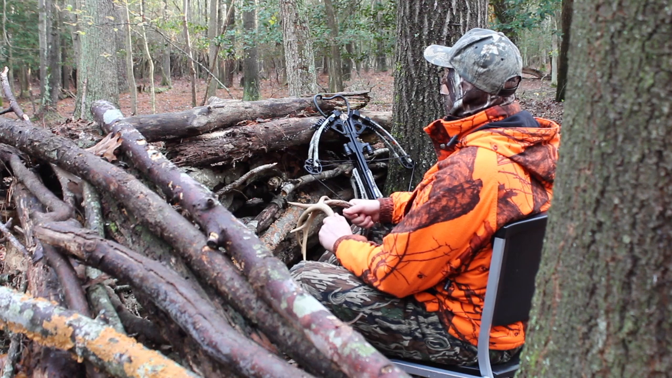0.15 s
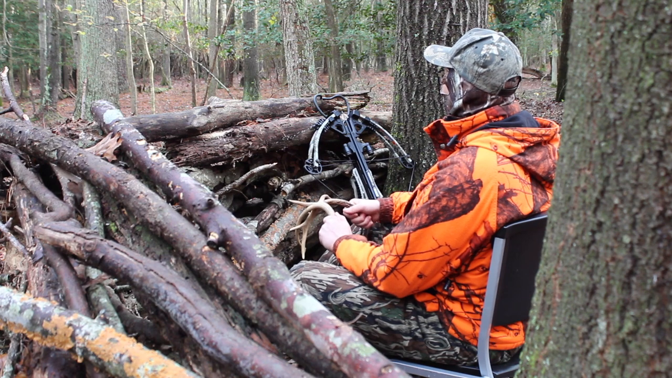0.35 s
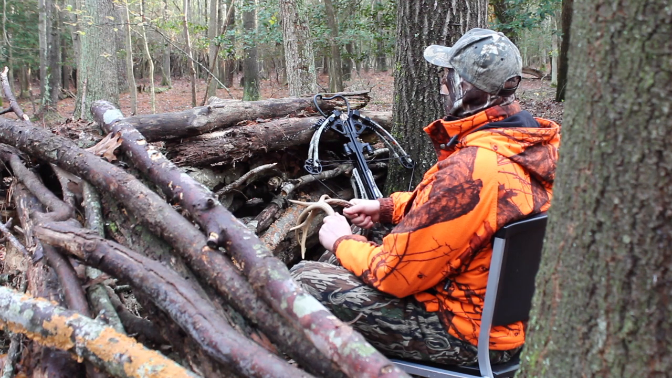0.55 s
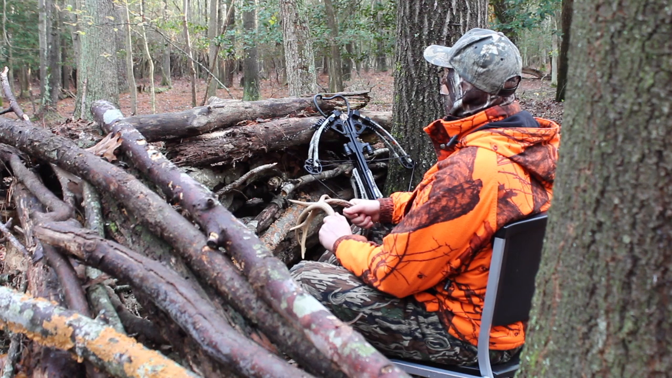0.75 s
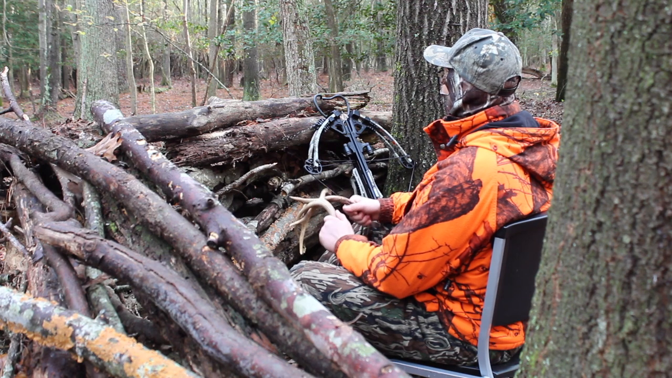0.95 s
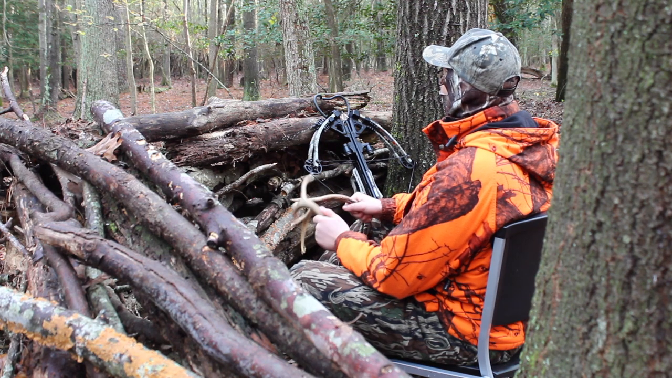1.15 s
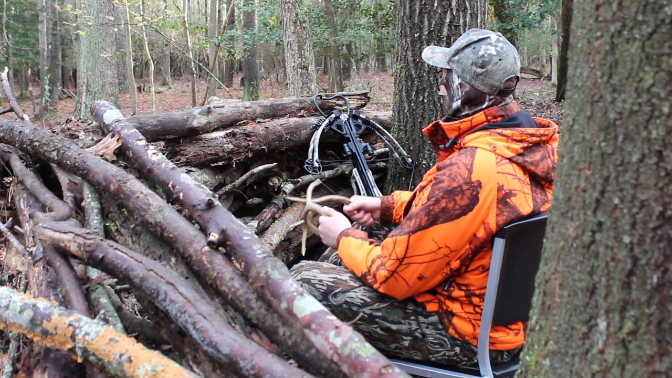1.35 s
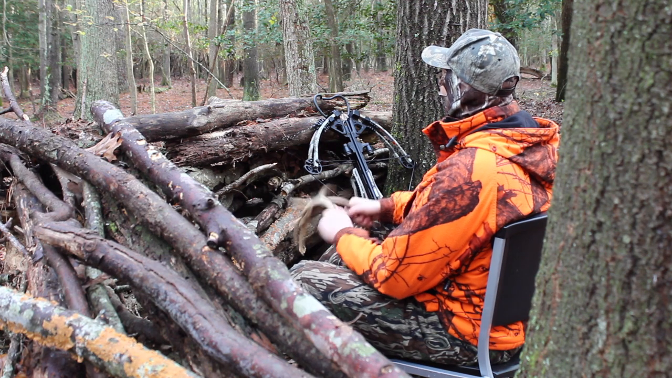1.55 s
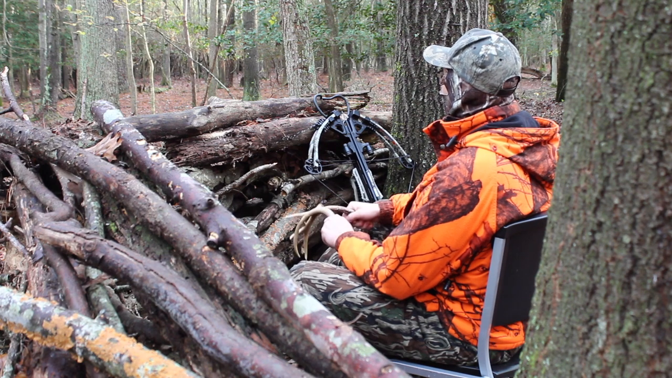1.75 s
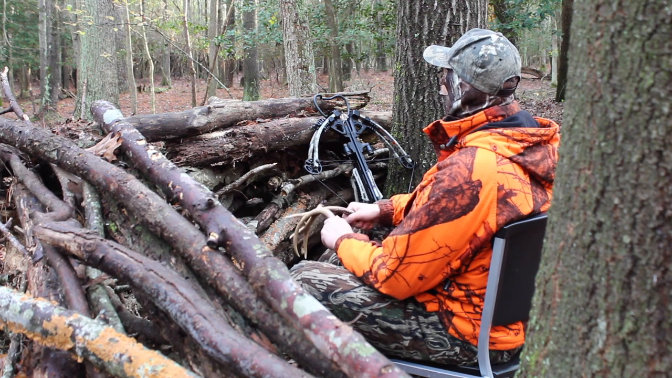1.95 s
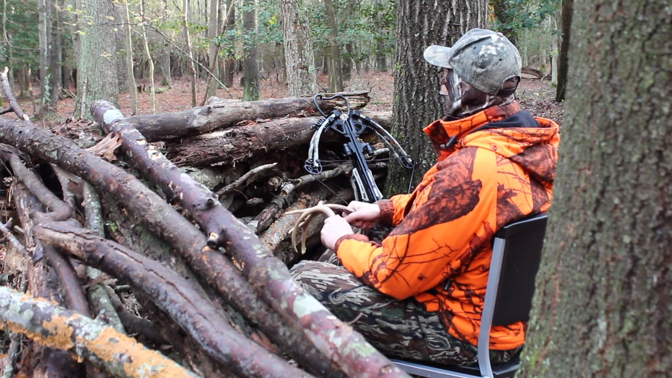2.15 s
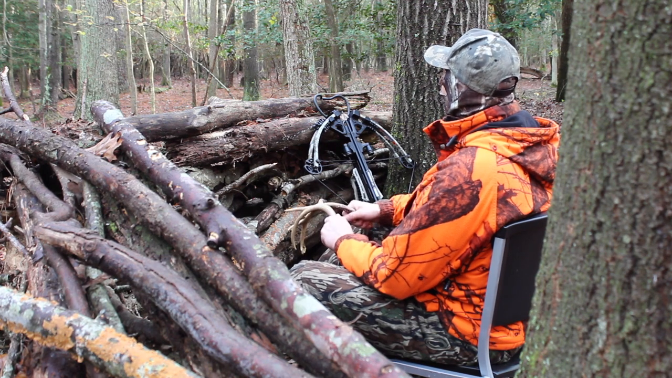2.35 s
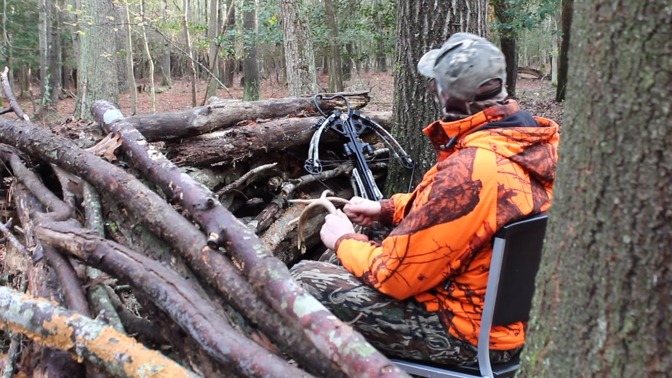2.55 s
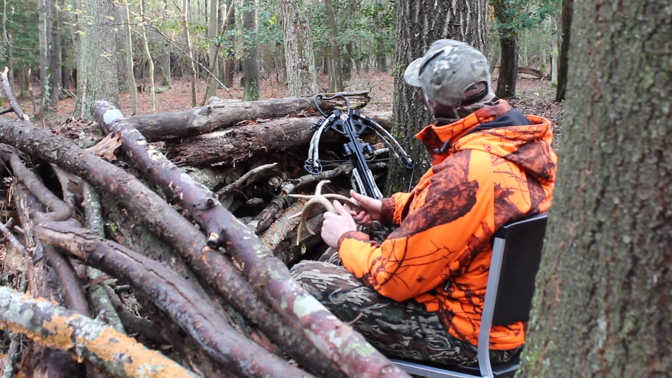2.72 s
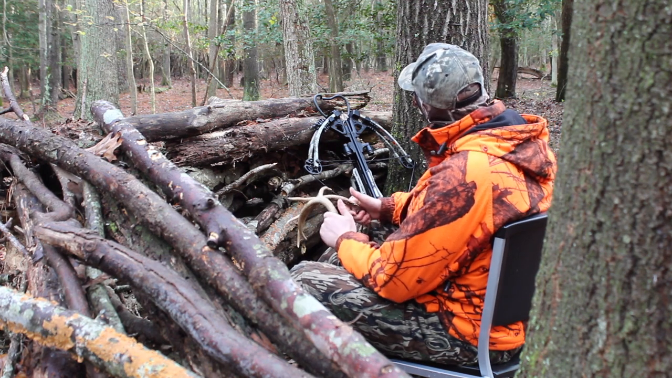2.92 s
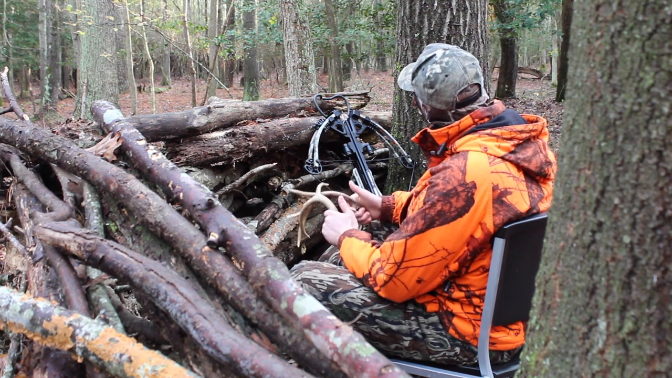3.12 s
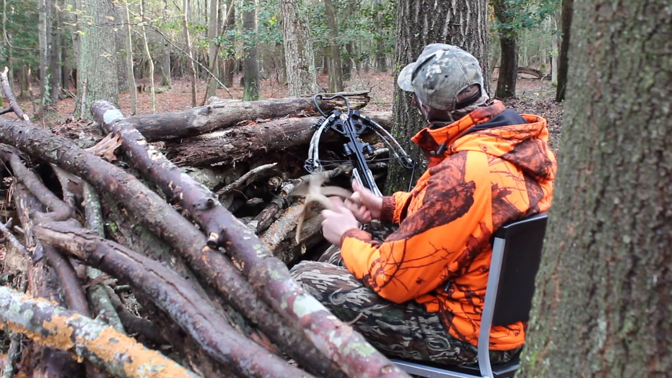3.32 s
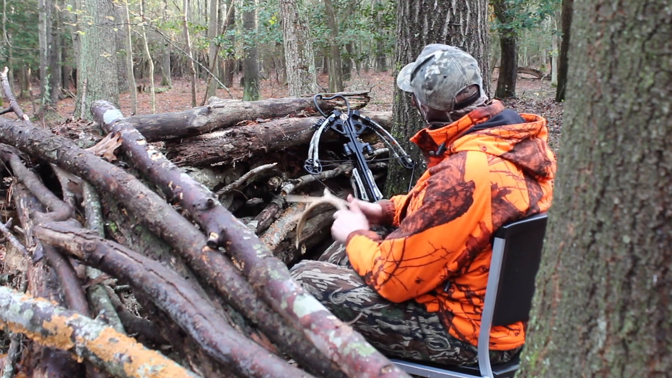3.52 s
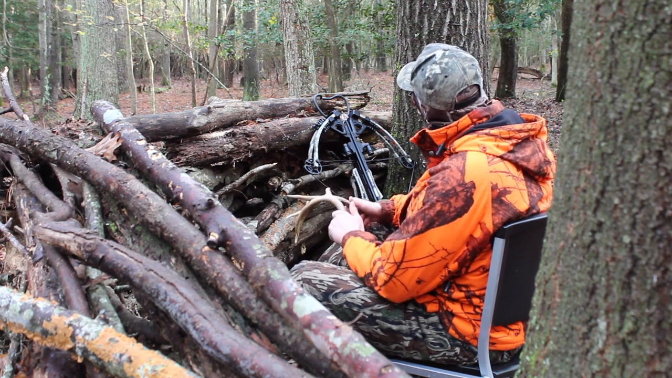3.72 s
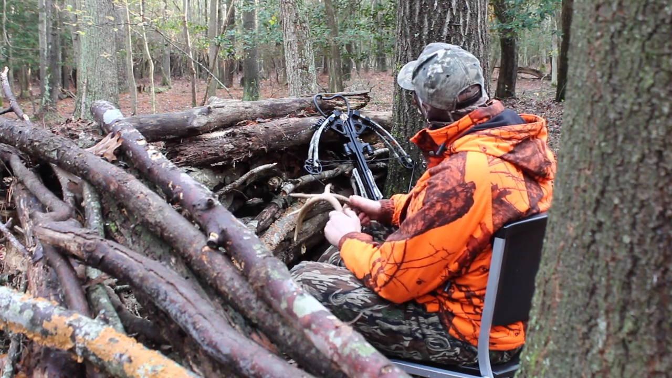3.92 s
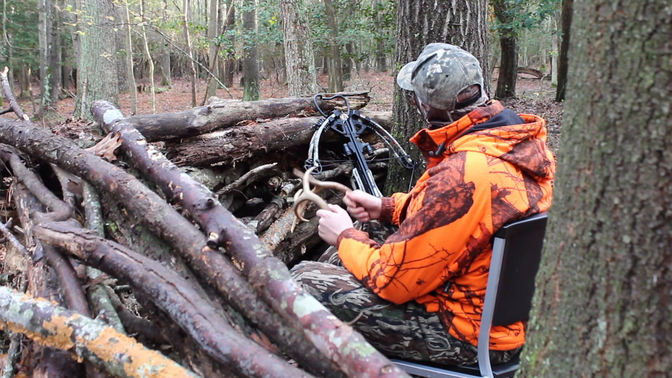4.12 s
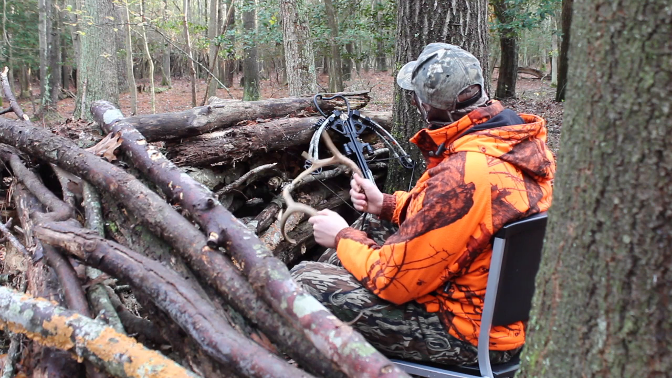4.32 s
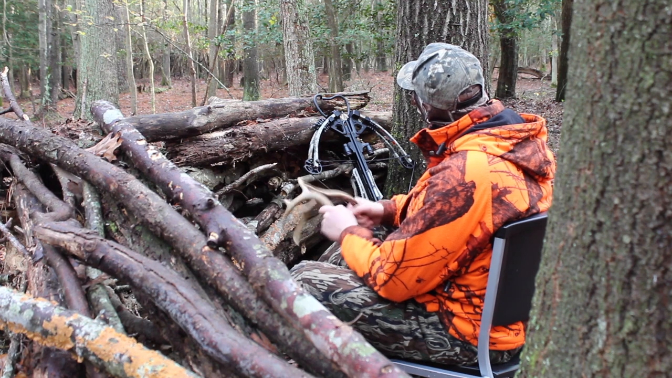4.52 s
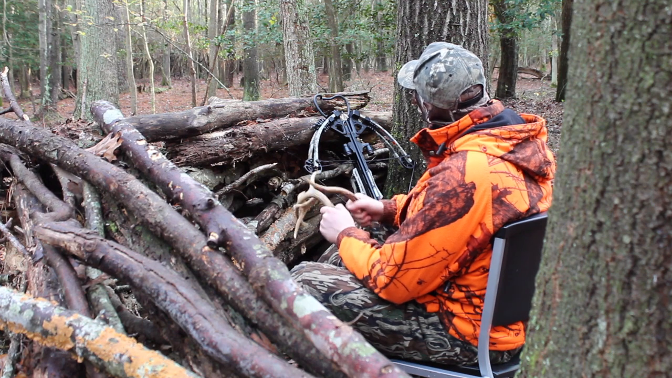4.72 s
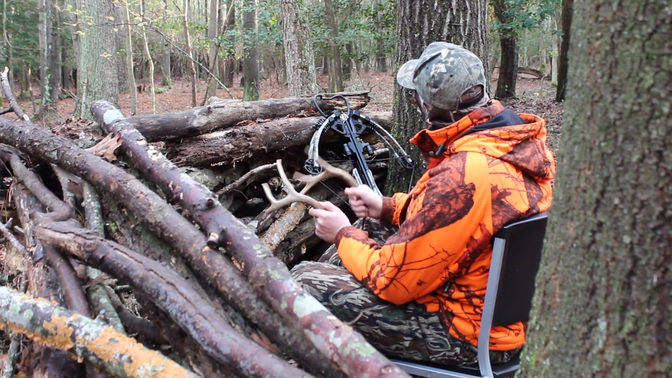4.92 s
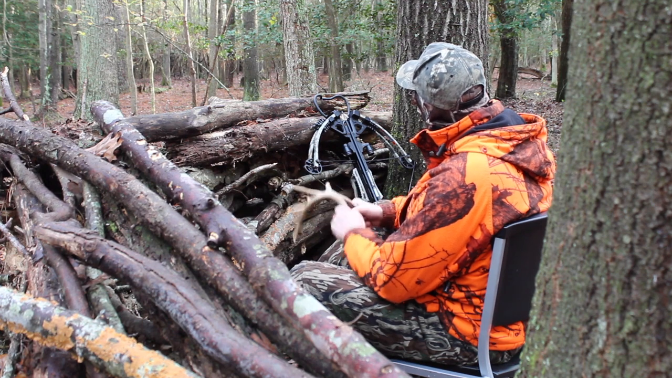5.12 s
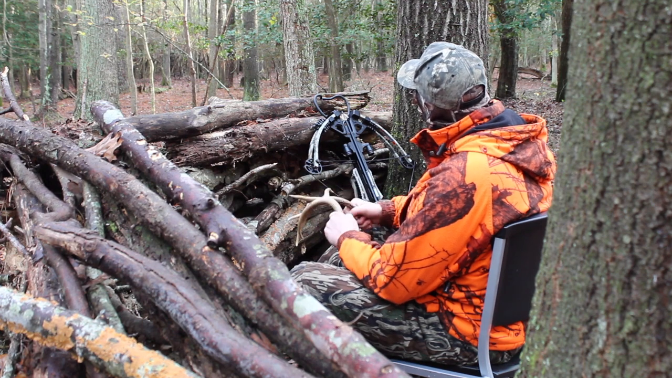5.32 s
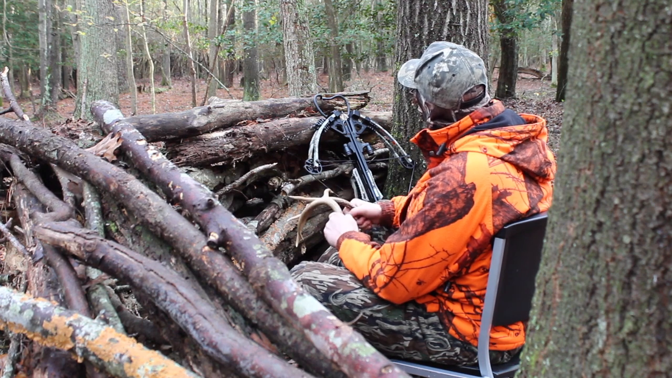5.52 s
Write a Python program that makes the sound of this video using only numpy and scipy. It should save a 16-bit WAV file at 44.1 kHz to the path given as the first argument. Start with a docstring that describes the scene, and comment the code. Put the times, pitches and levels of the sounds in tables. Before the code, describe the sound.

A very quiet forest: soft, low-weighted air with a faint, far traffic hum and drone. At 0.1-0.3 s a thin, very high bird note flicks up and holds, far among the trees. Near 1.0 s antler tines rub faintly, then clacks come at 1.3-1.4 s, with a stronger one at 1.6 s. A pause follows, with only weak ticks at 2.6 and 2.9 s and a barely audible second bird note around 2.9-3.05 s. Clacks resume at 3.24 s, with a loud, bright crack at 3.5 s. Lighter taps at 4.0 and 4.2 s lead to a very hard clack at 4.53 s, dull knocks and gritty scrapes, a tiny rising creak at 4.85 s, and the loudest double crack at 5.14 s, with a last small click at 5.2 s. Hits are close, dry and bony, with quick rebounds and a faint bright woodland tail fading into air.

```python
"""Soft forest air over a faint far rumble, then a thin bird note; then a seated hunter's antlers clack.
He knocks two deer antlers together in short bursts inside a blind of piled logs.
Each clack is a noise crack plus decaying sine modes of the bone, and many rebound; tines rub as filtered slips.
The bird is a sine with a moving pitch; the trunks' long bright wash is a convolution with decaying noise.
Air is shaped noise, and the far traffic is a wavering hum and drone."""
import sys
import numpy as np
from scipy import signal
from scipy.io import wavfile
from scipy.ndimage import uniform_filter1d, minimum_filter1d

SR = 44100
rng = np.random.default_rng(int(sys.argv[2]) if len(sys.argv) > 2 else 0)


def dump_mix(stems):
    """Bounce the given channels to the path in sys.argv[1] as a 16-bit WAV at rate SR."""
    frames = np.atleast_2d(stems).T  # one column per channel
    limited = np.clip(frames, -1, 1)  # hard clip at full scale
    pcm = np.round(limited * 32767).astype(np.int16)
    wavfile.write(sys.argv[1], SR, pcm)


N = 250047


REBOUND_LOSS_DB, REBOUND_SOFTER_DB, REBOUND_FULLER_DB = 12.5, 4, 2
SHORTEST_REBOUND_S = .005
KNOCK_HARDNESS_DB, KNOCK_BODY_DB, KNOCK_TINE_HZ, KNOCK_BEAM_HZ = -4.5, -1.5, 3700, 1510
# Tine on tine: start_s [s], level_db [relative dB, 2.2-5.5 kHz], hardness_db [dB of snap over level],
# body_db [dB over level], tine_hz [Hz], beam_hz [Hz], rebound_s [s after the clack; .005 or less: none]
TINE_CLACKS = [(1.2903, -49.5, 5, -14.5, 4980, 2770, 0), (1.3688, -37.5, 6.5, -13, 4900, 1345, .0136),
               (1.3852, -34.5, -2.5, -19, 5550, 2770, .012), (1.6056, -25, -1.5, -12.5, 4030, 2755, .0156),
               (2.596, -49, -6, -13, 3990, 2630, 0.001), (2.6135, -43.5, 5.5, -17.5, 5250, 2610, 0),
               (2.8792, -52, -12.5, -12, 3186, 2904, 0.0003),
               (3.2428, -32, 0.5, -12.5, 4740, 2900, 0.00091), (3.355, -43.5, 1, -18, 4900, 2710, .011),
               (3.478, -37, 1.5, -10.5, 6050, 2172, .018), (3.514, -24.5, 4.5, -12.5, 6440, 2730, .019),
               (4.0137, -40.5, 3.5, -24.5, 7100, 2880, .0137), (4.2279, -47.5, 4.5, -16, 6840, 2080, 0),
               (4.247, -52.5, 6.5, -11.5, 6740, 3116, 0.00079),
               (4.535, -21.5, 4.5, -21.5, 5100, 3180, .0212), (4.563, -27, 0.5, -16.5, 5700, 1865, .011),
               (4.786, -41.5, -7.5, -12.5, 4184, 1928, 0.00032),
               (4.882, -59.5, 1.5, -7.5, 4440, 2300, 0.00053), (5.1431, -25.5, 7, -14.5, 6050, 1750, 0),
               (5.1446, -20, 4.5, -11, 5070, 1800, .0245), (5.1972, -39.5, 9, -20, 5130, 2810, 0.00019)]
# Dull knocks of beam on beam as the antlers settle: start_s [s], level_db [relative dB, 2.2-5.5 kHz]
BEAM_KNOCKS = [(1.3341, -58), (1.404, -49), (1.517, -65), (1.631, -51), (3.378, -60), (4.6234, -44.5),
               (4.643, -58), (4.712, -63)]


def contacts():
    """Lossy impact: a rebound returns weaker, softer and fuller; yields clacks, rebounds and knocks."""
    for start_s, level_db, hardness_db, body_db, tine_hz, beam_hz, rebound_s in TINE_CLACKS:
        yield start_s, level_db, hardness_db, body_db, tine_hz, beam_hz
        if rebound_s > SHORTEST_REBOUND_S:
            yield (start_s + rebound_s, level_db - REBOUND_LOSS_DB, hardness_db - REBOUND_SOFTER_DB,
                   body_db + REBOUND_FULLER_DB, tine_hz, beam_hz)
    for start_s, level_db in BEAM_KNOCKS:
        yield start_s, level_db, KNOCK_HARDNESS_DB, KNOCK_BODY_DB, KNOCK_TINE_HZ, KNOCK_BEAM_HZ


# Modes of the hand-held antlers: mode_hz [Hz], level_db [relative dB], lasting [multiple of the ring's t60]
ANTLER_MODES = [(564, -17, 1.3), (784, -16.5, 1.2), (1050, -16, 1.3), (1390, -8, 1.2), (1750, -8, 1.3),
                (2520, -14, 1.0), (2863, -5, 1.1), (3180, -7.5, 1.0), (3510, -0.5, 1.1), (4030, 4, 1.3),
                (4588, 1, 1.1), (5030, 1.5, 1.1), (5190, -2.5, 1.0), (6050, 0, 1.0), (6780, 1, 1.0),
                (7420, -4.5, .9), (7410, -2, .9), (8220, -2.5, 1.0), (9150, -4, .9), (9400, -14, .7)]


def antler_ring(t, t60, uneven_db, grip_detune):
    """Modal superposition: contact point and grip give each mode a new strength and slightly new pitch."""
    mode_hz, level_db, lasting = np.transpose(ANTLER_MODES)[:, :, None]
    strength, detune, sign = rng.standard_normal((3, len(ANTLER_MODES), 1))
    decay = from_db(level_db + uneven_db * strength - 60 * t / (t60 * lasting))
    modes = np.sign(sign) * decay * np.sin(2 * np.pi * mode_hz * (1 + grip_detune * detune) * t)
    return np.sum(modes, axis=0)


def log_pile(t, echo_db, t60):
    """Early reflection: direct sound, then a scatter of quick echoes from the logs and the ground."""
    arrivals = (rng.random(len(t)) < .05) * (t > .0015)
    echoes = rng.standard_normal(len(t)) * arrivals * from_db(-60 * t / t60)
    return (t == 0) + from_db(echo_db) * echoes / (np.linalg.norm(echoes) + 1e-12)


# A harder contact has more edge and a shorter ring.
EDGE_DB, EDGE_PER_HARDNESS = -15.5, 1.35
RING_T60_S, RING_HALVING_DB = .029, 21.5   # base decay; hardness rise that halves it
# Registers of a clack, in the order body, level, snap, edge: low_hz [Hz], high_hz [Hz]
CLACK_REGISTERS = [(900, 2200), (2200, 5500), (5500, 8500), (8200, 11300)]


def clacks(tick_db, crack_db, tine_db, beam_db, echo_db,
           crack_share=1.0, ring_share=0.54, thud_db=-11.0, thud_t60=0.07):
    """Impact excitation: a contact cracks and rings the bone; its place and hardness weight the registers."""
    out, t = np.zeros(N), np.arange(SR // 12) / SR
    filters = [signal.butter(3, edges, "band", fs=SR, output="sos") for edges in CLACK_REGISTERS]
    for start_s, level_db, hardness_db, body_db, tine_hz, beam_hz in contacts():
        edge_db = EDGE_DB + EDGE_PER_HARDNESS * hardness_db
        t60 = RING_T60_S * .5 ** (hardness_db / RING_HALVING_DB)

        # a sharp tick at contact, then the crowd of quickly damped modes of the tines
        tick = from_db(tick_db) * (t == 0)
        crowd = rng.standard_normal(len(t)) * from_db(-60 * t / (t60 * crack_share))
        crack = from_db(crack_db) * band(tick + crowd, 2200, 7300)
        bone = antler_ring(t, t60 * ring_share, uneven_db=2.0, grip_detune=0.014) + crack

        # the struck tine and its beam stand out
        bone = emphasis(bone, tine_hz, 6.5, tine_db)
        bone = emphasis(bone, beam_hz, 17, beam_db)
        blow = signal.fftconvolve(bone, log_pile(t, echo_db, t60=0.038))[:len(t)]

        # each register is set to its own rms, 9.5 dB below the tabled levels
        weights = from_db(level_db - 9.5 + np.array([body_db, 0, hardness_db, edge_db]))
        sound = sum(w * rms_one(signal.sosfilt(sos, blow)) for w, sos in zip(weights, filters))

        # the heavy base of the antler answers with a dull knock, set relative to the body register
        thud_noise = rng.standard_normal(len(t)) * from_db(-60 * t / thud_t60)
        thud = rms_one(band(thud_noise, 470, 880))
        add(out, start_s, sound + weights[0] * from_db(thud_db) * thud)
    return out


SLIDE_CREST = 0.48   # share of a slide over which the pressure builds before the tines part
# Sliding tines: start_s [s], end_s [s], level_db [dB of rms before the rise and fall]
TINE_SLIDES = [(1.016, 1.143, -61.5), (1.198, 1.243, -52.5), (1.557, 1.616, -59), (3.216, 3.25, -65.5),
               (3.354, 3.409, -57.5), (4.59, 4.635, -48), (4.69, 4.745, -62.5), (4.825, 4.899, -55),
               (5.176, 5.186, -46.5)]


def slides(slips_per_s=2200, uneven_db=2.0, grit_db=10):
    """Stick-slip friction: rough tines catch and slip, each slip a tiny gritty blow on the same modes."""
    out, t = np.zeros(N), np.arange(SR // 20) / SR
    for start_s, end_s, level_db in TINE_SLIDES:
        hardest_s = start_s + SLIDE_CREST * (end_s - start_s)
        s = np.arange(start_s, max(end_s, start_s + .005), 1 / SR)
        size = rng.standard_normal(len(s)) * from_db(uneven_db * rng.standard_normal(len(s)))
        slips = size * (rng.random(len(s)) < slips_per_s / SR)
        ring = antler_ring(t, 0.015, uneven_db=1.5, grip_detune=0.034)
        ringing = signal.fftconvolve(slips, ring)[:len(s)]
        rub = rms_one(band(ringing + 10 * from_db(grit_db) * slips, 1200, 8100, order=6))
        pressure = np.interp(s, [start_s, hardest_s, end_s], [0, 1, 0])
        add(out, start_s, from_db(level_db) * rub * pressure)
    return out


# A catching tine creaks upward as it runs toward the tip:
# start_s [s], end_s [s], first_hz [Hz], last_hz [Hz], level_db [relative dB, before the swell and roughness]
TINE_CREAKS = [(4.838, 4.88, 2900, 4500, -57)]


def creaks(rough_hz=1100):
    """Length and pitch: the free length of the tine shortens, so its rough note rises."""
    out = np.zeros(N)
    for start_s, end_s, first_hz, last_hz, level_db in TINE_CREAKS:
        along = np.linspace(0, 1, max(int((end_s - start_s) * SR), 2))
        pitch_hz = first_hz + (last_hz - first_hz) * along ** 2
        phase = 2 * np.pi * np.cumsum(pitch_hz) / SR
        roughness = narrow_noise(300, rough_hz)[:len(along)]
        swell = 2 * np.sin(np.pi * along ** 2)
        add(out, start_s, from_db(level_db) * swell * roughness * np.sin(phase))
    return out


BIRD_HZ = 7450   # centre of the held pitch
# Thin bird notes: start_s [s], end_s [s], level_db [dB of direct peak amplitude]
BIRD_NOTES = [(.127, .335, -78), (2.89, 3.06, -84)]


def bird(upsweep_hz=900, quaver_hz=110, buzz_hz=250):
    """Frequency modulation: a high note flicks up, buzzes at first and is then held with a quaver."""
    out = np.zeros(N)
    for start_s, end_s, level_db in BIRD_NOTES:
        t = np.arange(0, end_s - start_s, 1 / SR)
        buzz = -buzz_hz * np.exp(-t / .08) * narrow_noise(140, 120)[:len(t)] ** 2
        flick = -upsweep_hz * np.exp(-t / .004)
        quaver = quaver_hz * narrow_noise(60, 80)[:len(t)]
        pitch_hz = BIRD_HZ + flick + buzz + quaver
        swell = np.clip(np.minimum(t / .004, (end_s - start_s - t) / .04), 0, 1)
        add(out, start_s, from_db(level_db) * swell * np.sin(2 * np.pi * np.cumsum(pitch_hz) / SR))
    return out


# Wash from the trunks: band_hz [Hz], level_db [relative dB per Hz], t60_s [s, near trunks]
WOOD_WASH = [(399, -8, 0.55), (1500, 0.5, 0.32), (2800, -3.5, 0.88), (4100, 0.5, 0.7), (6200, -2, 0.57),
             (8000, -2, 0.56), (9600, 1, 0.38), (11500, -3, .3), (15000, -6, .27)]


def wood(x, build_s=.04, trunk_db=1.5, far_db=-20):
    """Reverberation: trunk echoes thicken, then decay band by band; far trees linger twice as long."""
    t = np.arange(SR) / SR
    wash = 0
    for hz, noise in noise_bands(SR):
        level_db, t60 = at_hz(WOOD_WASH, hz)
        near = from_db(-60 * t / t60)
        far = from_db(far_db - 60 * t / (2 * t60))
        wash = wash + noise * from_db(level_db) * np.hypot(near, far)
    # uneven trunks make the wash lumpy
    lumps = np.interp(t, np.linspace(0, 1, num=250), rng.standard_normal(size=250))
    wash = wash * from_db(trunk_db * lumps) * np.clip(t / build_s, 0, 1) ** 1.5
    return signal.fftconvolve(x, wash / np.linalg.norm(wash))[:N]


AIR_DB, HUM_HZ, DRONE_HZ = -69, 71, 595   # air rms; pitches of the far traffic
# Still air of the forest: band_hz [Hz], level_db [relative dB per Hz]
AIR_SPECTRUM = [(15, -48.5), (25, -20.5), (75, -11.5), (107, -11.5), (133, -7), (204, -12.5), (240, -7.5),
                (349, -5), (389, -8), (598, -1.5), (997, -6.5), (1080, -7.5), (2010, -16), (8810, -27),
                (15500, -49)]
# Hum of the far traffic: time_s [s], level_db [dB]
HUM_LEVELS = [(0, -84.5), (1.0, -92.5), (3.0, -91), (3.499, -85), (4.5, -85), (5.67, -82.5)]


def distance(drone_db=-82, waver=.35, overtone_db=-10):
    """Broadband and tonal background: soft forest air, with the hum and drone of far traffic."""
    t = np.arange(N) / SR
    air = rms_one(sum(noise * from_db(at_hz(AIR_SPECTRUM, hz)[0]) for hz, noise in noise_bands(N)))
    hum = np.sqrt(2) * np.sin(2 * np.pi * HUM_HZ * t) + waver * narrow_noise(HUM_HZ, 8)
    hum = hum + from_db(overtone_db) * narrow_noise(2 * HUM_HZ, 12)
    hum_gain = from_db(np.interp(t, *np.transpose(HUM_LEVELS)))
    drone = from_db(drone_db) * narrow_noise(DRONE_HZ, 36)
    return from_db(AIR_DB) * air + hum_gain * hum + drone


def from_db(db):
    """Logarithmic level: decibels to amplitude gain."""
    return 10 ** (np.asarray(db) / 20)


def rms_one(x):
    """Effective value: scale to an rms of 1."""
    return x / np.sqrt(np.mean(x ** 2) + 1e-20)


def band(x, low, high, order=2):
    """Band limitation: a causal band-pass."""
    sos = signal.butter(order, [low, min(high, .45 * SR)], "band", fs=SR, output="sos")
    return signal.sosfilt(sos, x + 1e-18)


def emphasis(x, hz, q, boost_db):
    """Resonance: lift one narrow peak out of a sound."""
    return x + (from_db(boost_db) - 1) * signal.lfilter(*signal.iirpeak(hz, q, fs=SR), x)


def at_hz(rows, hz):
    """Logarithmic frequency: read the columns of a spectrum at one frequency."""
    points, *columns = np.transpose(rows)
    return [np.interp(np.log(hz), np.log(points), c) for c in columns]


def add(track, s, sound):
    """Superposition: mix a sound into a track at a time."""
    at = int(s * SR)
    track[at:at + len(sound)] += sound[:N - at]


def narrow_noise(hz, width_hz):
    """Resonant filtering: noise passed twice through one resonance becomes a wavering tone."""
    r = np.exp(-np.pi * width_hz / SR)
    poles = [1, -2 * r * np.cos(2 * np.pi * hz / SR), r * r]
    once = signal.lfilter([1], poles, rng.standard_normal(N + SR))
    return rms_one(signal.lfilter([1], poles, once)[SR:])


def noise_bands(size):
    """Third-octave analysis: bands of noise with their centres; neighbours are unrelated."""
    edges = np.geomspace(20, 16000, num=30)
    white = rng.standard_normal((2, size + SR // 2))
    return [(np.sqrt(low * high), band(white[k % 2], low, high, order=2)[-size:])
            for k, (low, high) in enumerate(zip(edges, edges[1:]))]


# Antler resonances lifted in the sound that reaches the trees: mode_hz [Hz], q [ratio], boost_db [dB]
LINGERING_MODES = [(4030, 41, 3.5), (5100, 55, 3)]


def scene():
    """Direct and reverberant fields: antlers near the microphone, the bird deep among the trees."""
    rubbing, call = slides() + creaks(), bird()
    direct = clacks(tick_db=16.5, crack_db=9, tine_db=5.5, beam_db=9, echo_db=-11) + rubbing
    # the trees gather what the antlers radiate in all directions, so the struck tine and beam stand out less
    all_round = clacks(tick_db=30, crack_db=12, tine_db=1.5, beam_db=1.5, echo_db=-20) + rubbing
    for mode_hz, q, boost_db in LINGERING_MODES:
        all_round = emphasis(all_round, mode_hz, q, boost_db)
    reverberant = wood(from_db(-28.5) * all_round + .5 * call)
    return (direct + call + reverberant + distance())[None]


CUTOFF_HZ = 15400


def record(dry):
    """Peak limiting and low-pass: a quick limiter holds peaks to .85, then the top is cut."""
    allowed = np.minimum(1, .85 / (np.abs(dry) + 1e-9))
    gain = uniform_filter1d(minimum_filter1d(allowed, size=89), size=89)   # 2 ms windows
    low_pass = signal.ellip(10, .2, 70, CUTOFF_HZ, fs=SR, output="sos")
    return signal.sosfilt(low_pass, gain * dry)


dry = scene()
out = record(dry)
dump_mix(out)
```